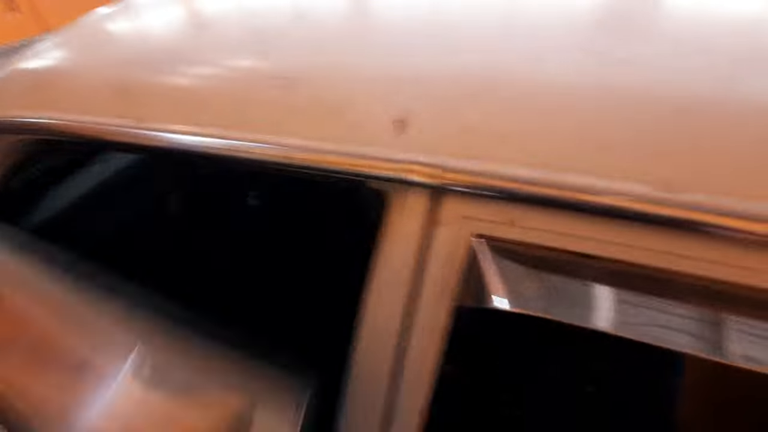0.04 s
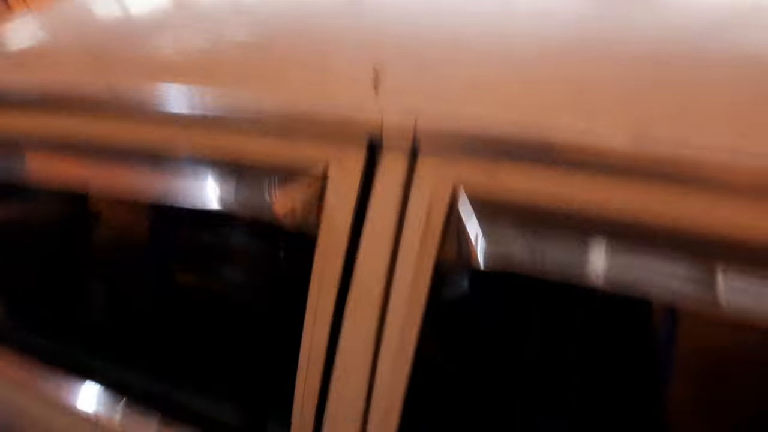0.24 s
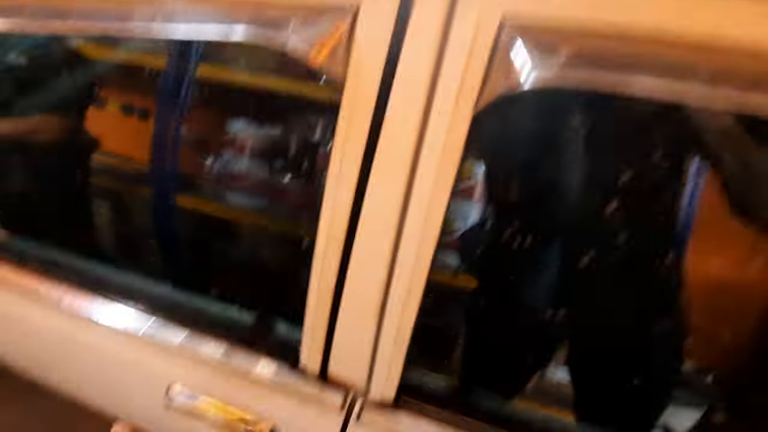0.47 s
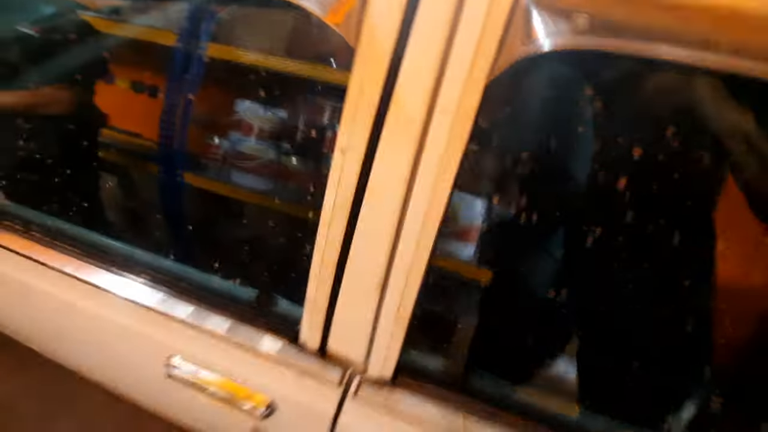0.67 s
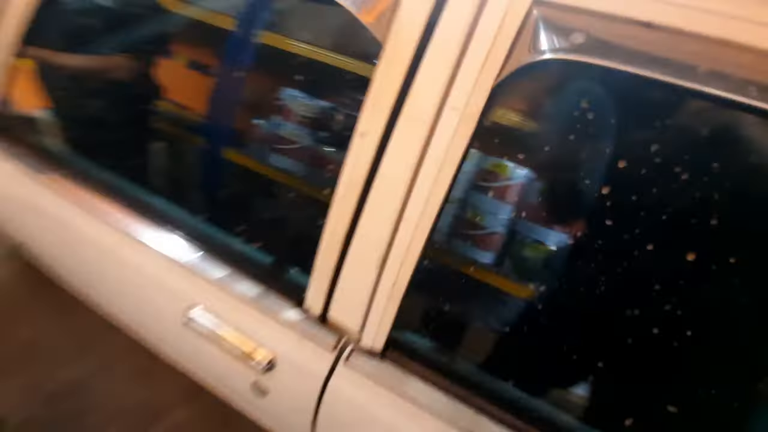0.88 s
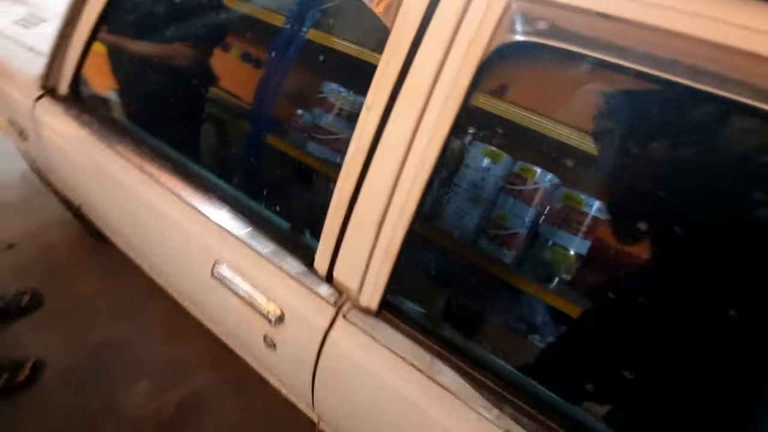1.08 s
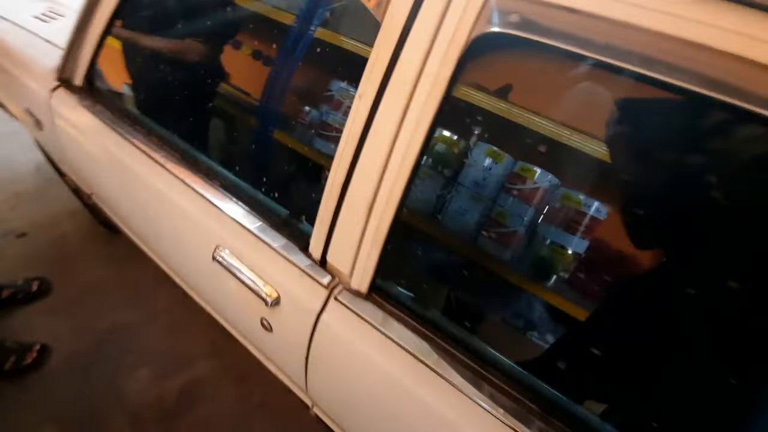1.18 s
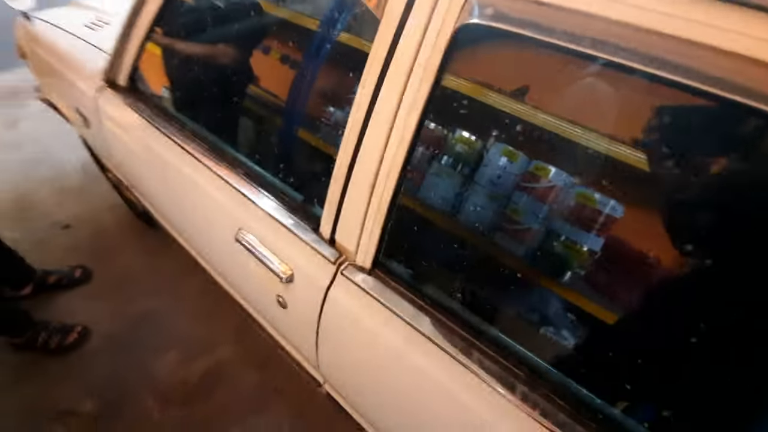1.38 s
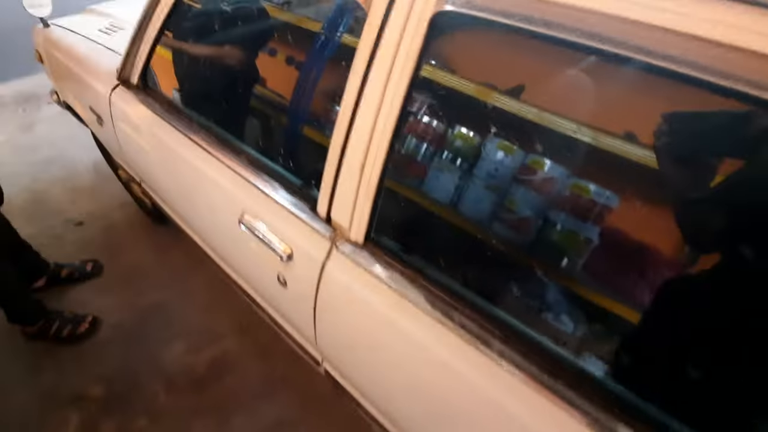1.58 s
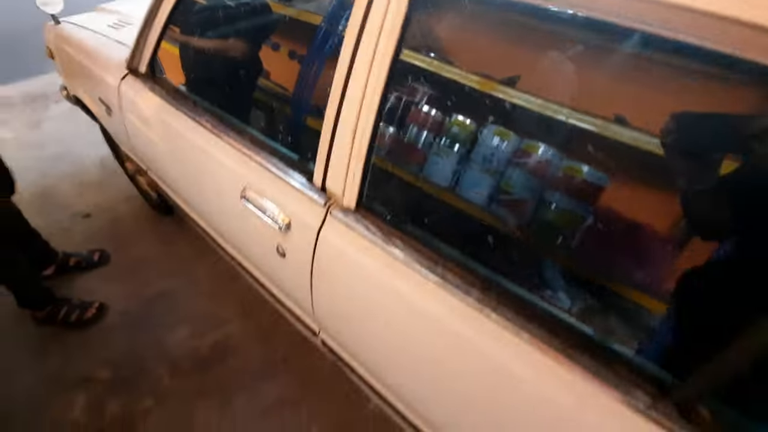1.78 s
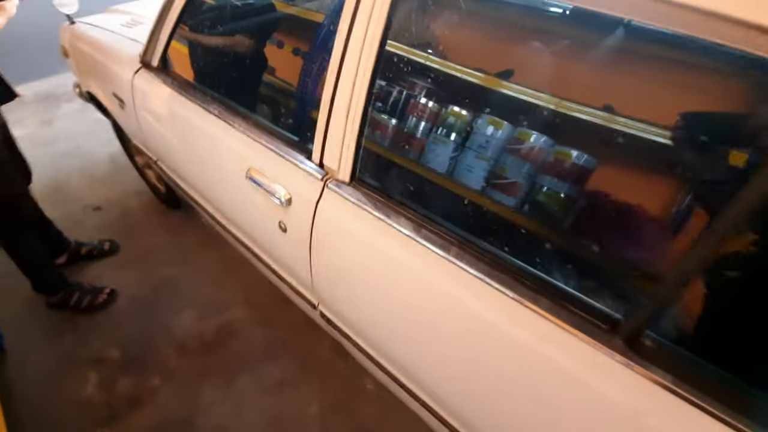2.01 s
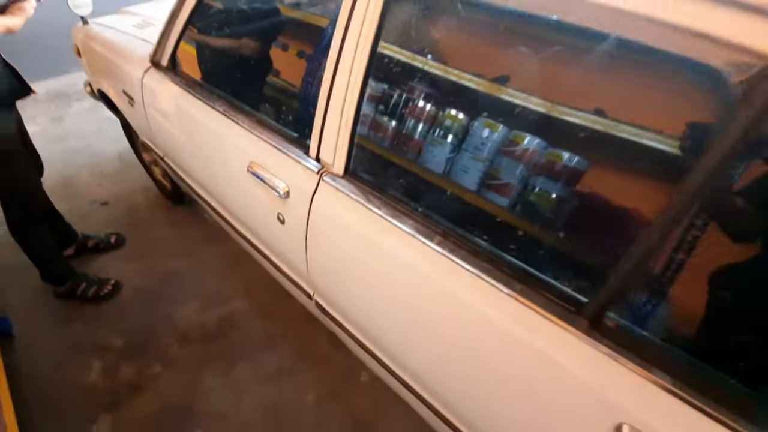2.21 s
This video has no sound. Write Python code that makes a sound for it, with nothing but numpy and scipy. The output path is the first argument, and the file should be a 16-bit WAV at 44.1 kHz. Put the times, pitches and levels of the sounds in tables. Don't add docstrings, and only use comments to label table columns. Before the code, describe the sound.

Close, heavy car door slam with a sharp latch rattle, then a hall echo over a low hum.

```python
import sys
import numpy as np
from scipy import signal
from scipy.fft import rfft, irfft
from scipy.io import wavfile
from scipy.ndimage import uniform_filter1d

SR = 44100
rng = np.random.default_rng(int(sys.argv[2]) if len(sys.argv) > 2 else 0)


def volts_from_decibels(level):
    exponent = np.asarray(level, float) / 20
    return 10 ** exponent


def pcm_store(signal):
    levels = np.round(np.clip(np.atleast_2d(signal), -1, 1) * 32767)
    wavfile.write(sys.argv[1], SR, levels.astype(np.int16).T)


N = 99225


def evened(x):
    return x / np.sqrt(np.mean(x ** 2) + 1e-20)


def read(points, hz):
    f, value = np.transpose(points)
    return np.interp(np.log(hz + 1), np.log(f + 1), value)


def add(mix, start_s, sound):
    part = mix[..., round(start_s * SR):][..., :sound.shape[-1]]
    part += sound[..., :part.shape[-1]]


def colour(x, gain):
    hz = np.fft.rfftfreq(x.shape[-1], 1 / SR)
    return irfft(rfft(x) * gain(hz), x.shape[-1])


def resonate(x, hz, width):
    return signal.lfilter(*signal.iirpeak(hz, hz / width, SR), x)


# frequency [Hz], level per Hz [dB].
FLOOR = [(25, -26), (80, -2), (400, -13.5), (1000, -22.5), (2400, -23), (4500, -30.5), (7500, -36.5),
         (13000, -33)]
# frequency [Hz], width [Hz], level [dB].
HUM = [(112, 19, -44.5), (176, 45, -53.5), (322.8, 21, -55.5), (659.4, 56, -62.5), (759, 81, -62.5)]


def workshop():
    floor_db, patch_db = -45.5, 1.2
    frames, hz = N // 256 + 5, np.fft.rfftfreq(1024, 1 / SR)
    re, im, patches = rng.standard_normal((frames, 513, 2, 3)).T
    patches = uniform_filter1d(patches[0], size=10, axis=0)
    patches = evened(uniform_filter1d(patches, size=12, axis=1))
    z = (re + 1j * im) * volts_from_decibels(read(FLOOR, hz)[:, None] + patch_db * patches)
    air = signal.istft(z, nperseg=1024, noverlap=768)[1][:, :N]
    air = volts_from_decibels(floor_db) * evened(air)
    noise = rng.standard_normal((2, N))
    hum = np.zeros((2, N))
    for f, width, db in HUM:
        tone = resonate(resonate(noise, f, width), f, width)
        hum += volts_from_decibels(db) * evened(tone)
    return air + hum


# start in seconds [s], level [dB], length [ms], centre [Hz], width [octaves].
SMALL_SOUNDS = [(.12, -74, 29, 1600, .4), (0.644, -48, 11.9, 8830, 2.1), (1.043, -59, 3.5, 3670, 0.34),
                (1.169, -49.5, 59, 5940, 2.6), (1.487, -51, 8.4, 3400, .2), (1.599, -52.5, 110, 1730, 0.27),
                (1.66, -53.5, 74, 6000, 2.1), (1.856, -55, 180, 3000, 2.3), (1.798, -61.5, 710, 2337, 0.015),
                (1.99, -60, 35, 2224, 0.018), (2.08, -61.5, 68, 2335, 0.01), (2.129, -60, 186, 1956, 0.0086),
                (2.235, -45.5, 30, 6000, 1.5), (2.233, -50.5, 48, 3300, .09), (2.235, -54, 40, 3950, .05),
                (2.235, -52, 40, 2800, .05), (1.467, -58, 2.5, 11030, 0.54), (1.49, -63, 2.7, 13200, .6),
                (.2212, -17, 3.5, 4000, 1.3), (.2958, -14, 3.5, 4300, .8), (.2038, -16, 8, 14000, .18),
        (.2745, -21, 3, 4500, .8), (.3, -24, 14, 2200, .7), (.3325, -24, 3.5, 7000, 1.4),
        (.262, -24, 50, 2000, .9), (1.0278, -39, 2.6, 14300, .35), (1.088, -46, 6, 4300, 1.1),
        (1.575, -46, 6, 2300, 1.1), (2.1, -58, 300, 645, 0.06), (1.875, -50, 110, 2900, .6)]


def tick(level_db, length_ms, centre_hz, octaves):
    u = np.arange(32768) * 1000 / SR / length_ms
    noise = rng.standard_normal((2, 32768))
    band = colour(noise, lambda hz: np.exp(-(np.log2(hz / centre_hz + 1e-3) / octaves) ** 2))
    envelope = np.minimum(u / 0.12, 1) * np.exp(-2.5 * u ** 2)
    return volts_from_decibels(level_db) * evened(band) * envelope


# start in seconds [s], level [dB], hold [ms], 60 dB fade [ms], tilt [dB per octave].
RATTLES = [(.1825, -35, 30, 20, -13), (.2037, -14.5, 5, 50, -.6), (.2105, -17, 0.79, 13.3, -5),
           (.214, -23.5, 30, 44.4, -10), (.256, -26, 45, 25, -6.5), (.2212, -17, 5.1, 24, -7),
           (.2295, -22, 2.1, 13, -4), (.2482, -17, 3.5, 20, -4.5), (.259, -26, 1.7, 17, -2.5),
           (.268, -24, 1.5, 14, -2.5), (.2742, -24, 1.5, 18, -4), (.301, -29, 9, 20, -10),
           (.2935, -31, 1.5, 12, -1.5), (.2958, -22, 1.5, 14, -4.5)]
# frequency [Hz], level per Hz [dB].
LATCH = [(500, -7.5), (1200, -4), (3200, -3), (4600, -2.5), (7200, -5), (11500, -1), (14200, -11),
         (15800, -9)]
# frequency [Hz], width [Hz], level [dB].
LATCH_RINGS = [(2870, 230, -33), (4660, 450, -20), (5180, 285, -5.5), (6220, 520, -16), (8200, 200, -11.5),
               (11300, 1500, -7.5)]


def rattle(level_db, hold_ms, fade_ms, tilt_db):
    clicks_per_s, spread_db, size = 20000, 4.5, 4096
    t_ms = np.arange(size) * 1000 / SR
    strength = volts_from_decibels(spread_db * np.minimum(rng.exponential(1, size), 2.5))
    struck = rng.random(size) < clicks_per_s / SR
    clicks = rng.standard_normal((2, size)) * strength * struck
    rings = sum(volts_from_decibels(db) * resonate(clicks, hz, width) for hz, width, db in LATCH_RINGS)
    clicks = clicks + 0.64 * rings
    steel = colour(clicks, lambda hz: volts_from_decibels(read(LATCH, hz) + tilt_db * np.log2(hz / 5000 + 0.17)))
    fade = volts_from_decibels(level_db - 60 * np.maximum(t_ms - hold_ms, 0) / fade_ms)
    return evened(steel) * np.minimum(t_ms / 0.26, 1) * fade


# start in seconds [s], signed strength [linear], contact [ms].
BLOWS = [(0.185, 0.04, 1.55), (0.1891, -0.05, 1.96), (0.198, -0.011, 1.5), (0.209, 0.15, 1.2),
         (0.215, -0.092, 0.78), (0.2183, -0.048, 0.68), (0.2212, 0.34, 0.71), (0.2251, -0.21, 1.2),
         (0.2304, 0.48, 1.04), (0.234, 0.18, 1.1), (0.2435, -0.39, 1.3), (0.2476, 0.26, 1.3),
         (0.2526, .4, 1.3), (0.258, 0.7, 2.4), (.2636, -0.76, 1.86), (0.2688, 0.081, 1.3),
         (0.2796, -0.48, 1.24), (0.296, 0.11, 3.2), (0.302, 0.5, 2.9), (0.3107, -0.26, 2.1),
         (.327, -0.52, 4.1), (.342, -0.23, 1.5), (0.371, 0.47, 3.1), (0.408, 0.29, 2.65),
         (0.446, 0.28, 4.1), (0.493, 0.22, 4.7), (.58, 0.081, 4.5)]
# frequency [Hz], level [dB], 60 dB decay [s].
PANEL = [(66.9, -8, 0.27), (102, -8, 0.085), (144.3, -0.5, 0.074), (224, 2.5, 0.043), (271, 2, 0.039),
         (314.7, 2.5, 0.08), (392.6, 0.5, 0.092), (515, 5, 0.056), (667, 9, 0.013), (880, 2, 0.04),
         (1030, -3, 0.049), (1200, -11, 0.035), (1453, -13, .05), (2130, -19, .03)]


def thud():
    push, t = np.zeros(N), np.arange(SR // 2) / SR
    for start_s, strength, contact_ms in BLOWS:
        bump = np.hanning(max(int(contact_ms * SR / 500), 50))
        add(push, start_s, strength * bump / np.sqrt(bump.sum()))
    hz, db, t60 = np.transpose(PANEL)[..., None]
    decay = volts_from_decibels(db - 60 * t / t60)
    quarter_turns = rng.choice([-1, 1], hz.shape) / 4
    views = []
    for detune, turn in ((1, 0), (1.02, quarter_turns)):
        modes = decay * np.cos(2 * np.pi * (hz * detune * t + turn))
        views.append(modes.sum(0))
    return 0.049 * signal.fftconvolve(push[None], np.array(views), axes=1)[:, :N]


# frequency [Hz], 60 dB decay [s].
HALL_T60 = [(60, 2.65), (250, 1.074), (1000, 1.14), (3000, 1.23), (6000, 0.93), (11000, 0.87),
            (15000, 0.56)]
# frequency [Hz], level [dB].
HALL_COLOUR = [(50, -13), (150, -0.5), (310, 6.5), (750, 12), (1200, 6.5), (3000, 4), (8000, 5.5),
               (11000, 0), (14000, 7)]


def hall(x):
    hall_db, rise_s, scatter_hz = -8.5, 0.0067, 31
    size = 2 * SR
    taps = np.zeros((6, size))
    at = np.arange(200, size - 20, 20) + rng.integers(0, 20, (6, (size - 201) // 20))
    np.put_along_axis(taps, at, rng.choice([-1., 1.], at.shape), 1)
    hz, t, z = signal.stft(taps, SR, nperseg=512)
    z = z * volts_from_decibels(read(HALL_COLOUR, hz)[:, None] - 60 * t / read(HALL_T60, hz)[:, None])
    tail = signal.istft(z, SR, nperseg=512)[1][:, :size]
    tail = tail * np.minimum(np.arange(size) / SR / rise_s, 1)
    phase = scatter_hz * np.arange(N) / SR + np.arange(6)[:, None] // 2 / 3
    feed = x * np.sqrt(2 / 3) * np.cos(2 * np.pi * phase)
    wet = signal.fftconvolve(feed, tail / np.linalg.norm(tail[0]), axes=1)[:, :N]
    return volts_from_decibels(hall_db) * wet.reshape(3, 2, N).sum(0)


def ports(a, b, same, lead_us, left):
    hz = np.fft.rfftfreq(N, 1 / SR)
    likeness = np.clip(read(same, hz), 0, 1)
    half = volts_from_decibels(read(left, hz) / 2) * np.exp(1j * np.pi * hz * lead_us / 1e6)
    shared = np.sqrt((1 + likeness) / 2) * rfft(a)
    apart = np.sqrt((1 - likeness) / 2) * rfft(b)
    return irfft(np.array([(shared + apart) * half, (shared - apart) / half]), N)


# frequency [Hz], left-right likeness [0 to 1].
NEAR_SAME = [(60, .93), (250, 0.76), (600, 0.66), (1400, 1), (3000, 0.7), (7000, 0.23), (14000, 0.13)]
# frequency [Hz], left minus right [dB].
NEAR_LEFT = [(60, 4), (250, -0.5), (600, 5), (1600, 2), (5000, -0.5), (9000, 2.5), (13000, 4.5)]
# frequency [Hz], left-right likeness [0 to 1].
FAR_SAME = [(60, 0.95), (250, 0.97), (600, 0.47), (1400, 0.1), (3000, 0.039), (7000, 0.16), (14000, .2)]
# frequency [Hz], left minus right [dB].
FAR_LEFT = [(60, -1.5), (600, 3.5), (3000, 1.5), (14000, 3.3)]


def scene():
    slam_db = 4.5
    door, small = thud(), np.zeros((2, N))
    for start_s, *row in RATTLES:
        add(door, start_s, rattle(*row))
    for start_s, *row in SMALL_SOUNDS:
        add(small, start_s, tick(*row))
    door = volts_from_decibels(slam_db) * door
    far = hall(door[0]) + workshop() + small
    near_ports = ports(*door, NEAR_SAME, lead_us=147, left=NEAR_LEFT)
    far_ports = ports(*far, FAR_SAME, lead_us=27, left=FAR_LEFT)
    return near_ports + far_ports


def low_pass(x):
    return signal.sosfilt(signal.butter(12, 17080, fs=SR, output="sos"), x)


# time in seconds [s], gain [dB].
GAIN = [(0, -2), (0.183, 2), (0.264, -8.5), (.42, -10.5), (0.679, -7.5), (.88, -8.5), (1.04, -8.5),
        (1.112, -6), (1.3, -7), (1.45, -8), (1.578, -4), (1.8, -2.5), (2.25, -0.3)]
# frequency [Hz], gain [dB].
MIC = [(7500, 1.89), (9400, -5.5), (11000, -1), (15600, -0.5), (16100, -31), (17000, -62.5)]


def record(dry):
    low_cut_hz, ceiling = 40, 0.8
    x = signal.sosfilt(signal.butter(2, low_cut_hz, "high", fs=SR, output="sos"), dry)
    x = x * volts_from_decibels(np.interp(np.arange(N) / SR, *np.transpose(GAIN)))
    drive = x / ceiling
    x = ceiling * np.tanh(drive ** 3 / 3 + drive)
    x = colour(x, lambda hz: volts_from_decibels(read(MIC, hz)))
    return low_pass(x)


dry = scene()
out = record(dry)
pcm_store(out)
```